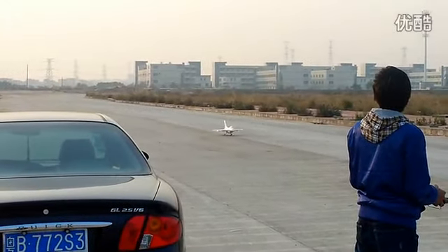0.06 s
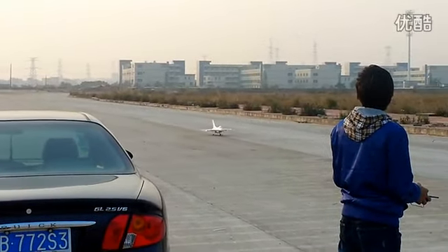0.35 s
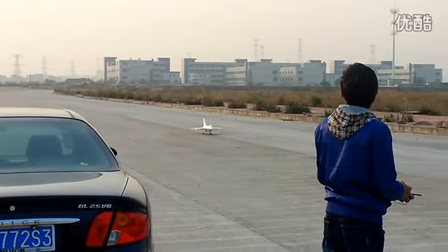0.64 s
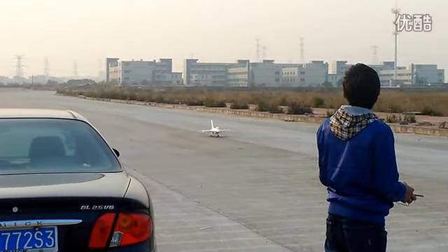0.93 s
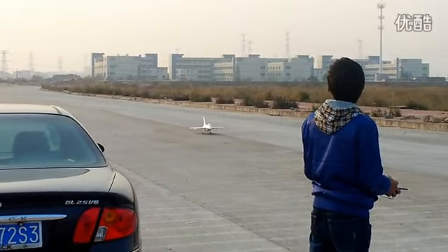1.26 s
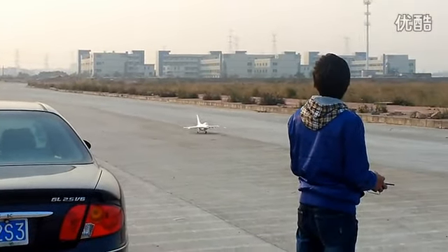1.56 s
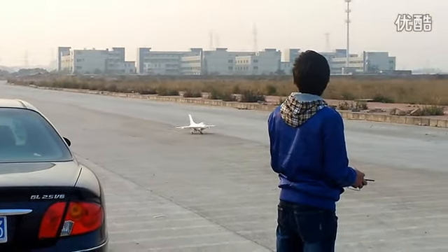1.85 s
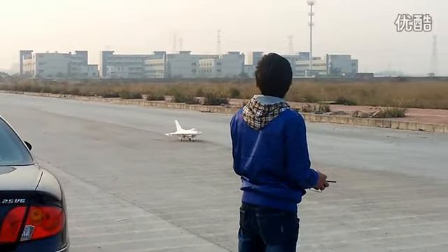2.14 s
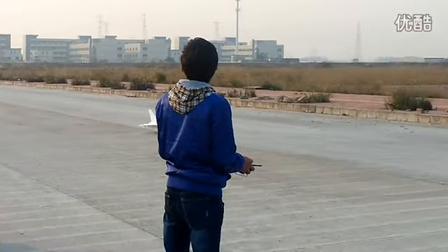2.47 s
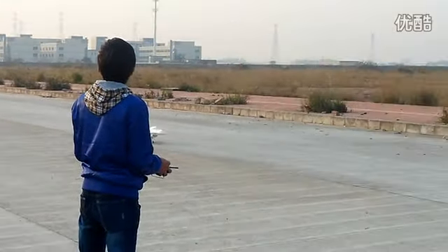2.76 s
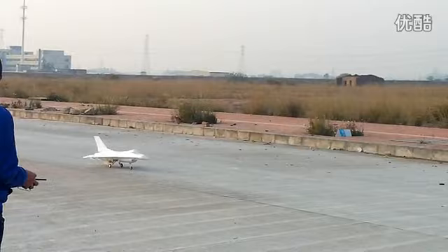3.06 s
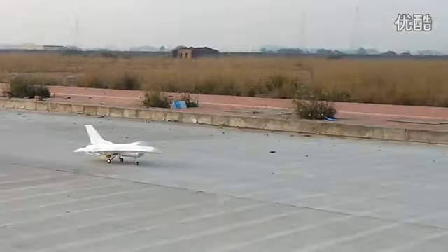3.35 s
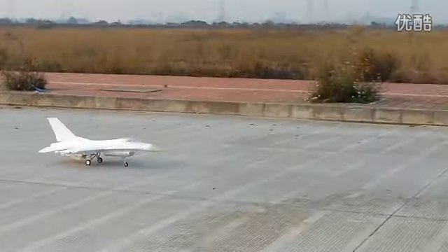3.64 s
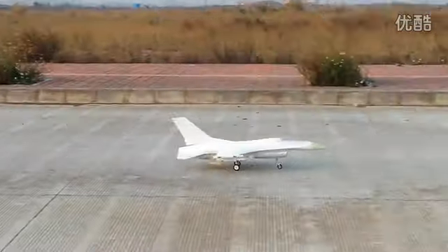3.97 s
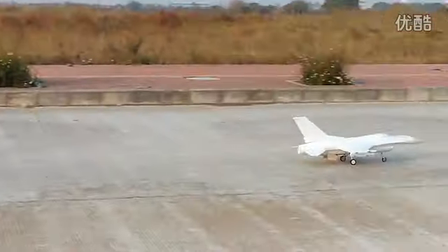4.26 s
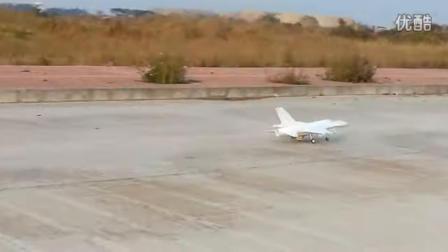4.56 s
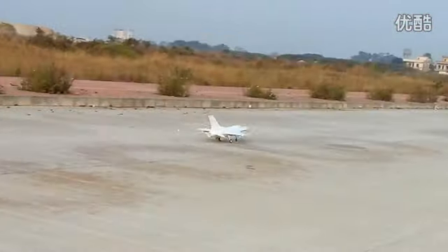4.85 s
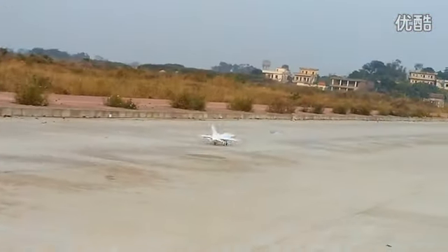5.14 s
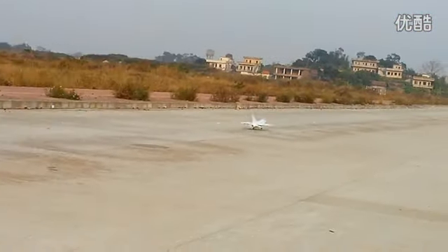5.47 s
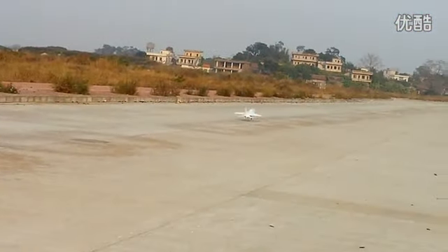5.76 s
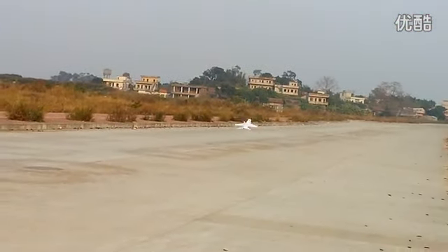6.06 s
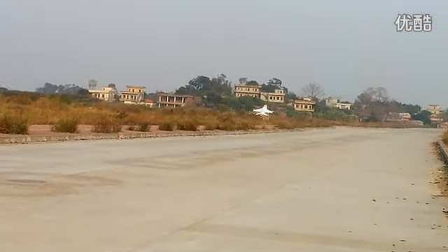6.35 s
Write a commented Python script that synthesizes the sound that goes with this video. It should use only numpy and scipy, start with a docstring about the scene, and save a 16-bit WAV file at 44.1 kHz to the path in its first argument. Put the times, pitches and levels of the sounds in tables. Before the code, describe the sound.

A model jet's electric ducted fan spools up some way off, outdoors, with a high, ragged whine over rushing air and a faint breeze on the microphone. The whine climbs gradually, then rises sharply at about 2 seconds, reaching full throttle by 2.5 seconds. The jet grows louder as it approaches, with a hollow duct hum and an uneven low rumble of wheels on concrete. The whine flutters and flares, strongest around 3.5 seconds. At about 4 seconds the jet passes with a roaring whoosh, the loudest moment, and its pitch slides down. A bright exhaust hiss swells just afterwards, and the wheel rumble drops away by about 4.7 seconds. The lower whine and airy roar then recede. The model lifts off near 5.7 seconds, and the fading rush takes on a slight sweeping tone, still audible at 6.5 seconds.

```python
"""Model ducted-fan jet taking off.

An electric fan spools up and whines out of the intake; the wheels rumble on a concrete road in open
country and the duct hums. The jet roars past, its pitch drops by Doppler shift and the exhaust hiss
turns to the listener. After lift-off the ground bounce sweeps notches through the noise.
One small microphone in a faint breeze."""
import sys
import numpy as np
from scipy import signal
from scipy.fft import rfft, irfft, next_fast_len
from scipy.io import wavfile
from scipy.ndimage import uniform_filter1d, map_coordinates

SR = 44100
rng = np.random.default_rng(int(sys.argv[2]) if len(sys.argv) > 2 else 0)


def wrap_up_sound(samples):
    """Save the sound to the file named by the first command line argument, as 16-bit audio."""
    columns = np.atleast_2d(samples).T
    # keep every value between -1 and 1, then stretch to whole-number steps
    tamed = np.clip(columns, -1, 1)
    steps = np.round(tamed * 32767).astype(np.int16)
    wavfile.write(sys.argv[1], SR, steps)


N = 287091
TIME = np.arange(N) / SR
PASS_S, PASS_M, PASS_M_PER_S, ACCEL_M_PER_S2 = 4.15, 18.9, 17.07, 4.45  # closest approach
LIFT_OFF_S, BOUNCE_LAG_S_PER_S2 = 5.68, 0.000445

# Wind on the microphone: t/s, level/dB
WIND_LEVEL = [(0, -55), (1.6, -56.5), (1.9, -64), (3.2, -77), (3.8, -61), (4.6, -76), (5.5, -69),
              (6.51, -59)]
# Wind spectrum: f/Hz, relative density/dB
WIND_SPECTRUM = [(25, -25), (45, -16), (75, -11.5), (120, 1.5), (200, -6.5), (400, -38)]
# Exhaust rumble: f/Hz, relative density/dB
WAKE_SPECTRUM = [(110, -41), (150, -3.5), (200, 7.5), (250, -1.5), (310, -28)]
# Low hollow note, sinking: t/s, level/dB, f/Hz
LOW_NOTE = [(2.3, -52, 483), (2.5, -34, 446.5), (2.9, -44, 367.5), (3.15, -33.5, 344), (3.55, -37.5, 348),
            (3.85, -28, 350.2), (4.2, -35, 309), (4.6, -55, 287)]
# Body rumbling on its wheels: t/s, level/dB
RUMBLE_LEVEL = [(0, -44), (.7, -41.5), (1.9, -41.5), (2.1, -38), (2.35, -38), (2.55, -36.5), (2.75, -34),
                (2.92, -33.5), (3.15, -33), (3.33, -35.5), (3.6, -32.5), (3.76, -29), (4.08, -27.5),
                (4.35, -32.5), (4.65, -41), (5.3, -42), (6.51, -45)]
# Body rumble spectrum: f/Hz, relative density/dB
RUMBLE_SPECTRUM = [(80, -58), (130, -29.5), (175, -13.5), (230, -2.5), (290, -0.5), (352, 3.5), (425, -2),
                   (510, -18), (700, -48)]
# Duct hum and its lowest resonance: t/s, level/dB, f/Hz, resonant share/0-1
DUCT_HUM = [(0, -40.5, 810, 0.54), (1.7, -35, 847.6, 0.6), (2.65, -26, 867, 0.62),
            (3.05, -27.5, 836.5, 0.4), (3.3, -30.5, 848, 0), (3.93, -28, 828.4, 0.45), (4.1, -27, 823, 0.5),
            (4.35, -30.5, 800, 0.8), (4.6, -25, 805, 0.48), (4.95, -26.5, 804, 0.7), (5.7, -30, 763.6, 0.6),
            (6.51, -30.5, 731, 0.35)]
# Broad part of the hum: f/Hz, relative density/dB
HUM_SPECTRUM = [(380, -17), (480, -1.5), (570, 2), (660, 1), (780, 2.5), (950, -0.5), (1040, -2.5),
                (1250, -22)]
# Falling roar of the pass: t/s, level/dB, f/Hz
PASS_WHOOSH = [(3.7, -73, 1346), (3.87, -29, 1226), (3.96, -31, 1033), (4.03, -22, 966), (4.12, -22, 880),
               (4.22, -23, 816), (4.4, -28.5, 737.5), (4.8, -76, 688)]
# Roadside reflections: t/s, half-length/s, strength/0-1, lag/s, lag growth/(s/s)
ROADSIDE_ECHOES = [(4.272, 0.41, 0.17, 0.001315, 0.000049), (5.853, 0.23, 0, 0.00089, 0.0000092)]
# Brief swells and dips: t/s, half-length/s, roar gain/dB, treble gain/dB
SWELLS = [(0.308, 0.4, 2, 5), (2.198, 0.5, -2, 2), (2.72, 0.16, 1, -5), (2.94, 0.11, 1.5, -3),
          (3.042, 0.075, -0.5, -3.5), (3.164, 0.067, -2.5, 2), (3.36, 0.065, -1, -3), (3.472, 0.028, 4, 2),
          (3.626, 0.024, 2, 1), (3.685, 0.044, 0, -3.5), (3.823, 0.067, 3, -0.5), (4.2, 0.31, 0.5, -0.5),
          (4.833, 0.036, -2.5, -3.5), (4.926, 0.099, 3, 1), (5.29, 0.034, -3, 1.5), (5.841, 0.12, -0.5, 1),
          (6.24, 0.059, 0.4, -1), (6.4, 0.069, -0.5, 1)]
# Blade rush from far ahead, near, abeam, behind: f/Hz, relative density/dB
RUSH_FAR = [(2700, -6), (3250, -7), (3550, -5.5), (3750, 1.5), (4300, -2), (4900, -4.5), (5250, -10),
            (5550, -32.5), (6500, -17)]
RUSH_NEAR = [(2700, -22), (3050, -9), (3350, -1.5), (3850, 6), (4100, 4.5), (4400, 6.5), (4750, 4),
             (4980, 0), (5350, 6), (5750, 3), (6300, -4.5), (7300, -8)]
RUSH_ABEAM = [(2700, -12), (3250, -5.5), (3550, -1), (3900, -1), (4200, 4.5), (4600, 2.5), (5000, 2),
              (5450, 3), (5750, 2), (6100, -0.5), (6450, -2), (7300, -15)]
RUSH_BEHIND = [(2700, -15), (3250, 1), (3550, -0.5), (3900, 5.5), (4150, 2), (4450, 5), (4800, 2.5),
               (5200, 2.5), (5800, 1), (6400, -3), (7300, -4.5)]
# Exhaust hiss from ahead, from behind, and its top band: f/Hz, relative density/dB
HISS_AHEAD = [(4800, 7.5), (5700, 4), (6300, 3), (7000, 3), (7700, 6), (8200, 2), (9600, -1.5),
              (10200, -10), (10800, -33), (11800, -45)]
HISS_BEHIND = [(5000, -34), (6050, -1.5), (6500, -5.5), (7300, 5.5), (7780, 2.5), (8050, -7), (8500, -1.5),
               (9600, -5.5), (10400, -7.5), (11000, -14.5), (12000, -42)]
HISS_TOP = [(9800, 6), (10300, 1.5), (11000, -1), (11900, -1), (12300, -12), (14000, -34)]
# Jet mixing noise from far ahead, near, behind: f/Hz, relative density/dB
ROAR_FAR = [(1020, -37), (1110, -9.5), (1240, -2), (1400, -5), (1680, -5), (1830, 2), (2350, 1.5),
            (2570, -1), (2850, -1.5), (3250, -9), (3800, -38)]
ROAR_NEAR = [(850, 1), (1100, -1.5), (1350, 1), (1650, 2.5), (1870, 6), (2100, 3), (2400, 2.5), (2550, 3),
             (2780, 0), (3050, -3), (3800, -4)]
ROAR_BEHIND = [(950, -22), (1150, -1.5), (1350, -4), (1550, -4), (1750, -1), (2150, 0), (2380, -4.5),
               (2550, -2), (2780, -2), (3050, -7.5), (3400, -20), (4000, -25)]
# Directional pipe resonances: f/Hz, peak share of the roar/0-1, bearing/deg, half-width/deg
PIPE_MODES = [(2200, 0.2, 28, 4), (2303, 0.16, 60, 12), (1972, 0.11, 71, 17), (1960, 0.12, 83.5, 4.4),
              (2320, 0.15, 92, 12), (2348, 0.26, 128.6, 14), (1507, 0.11, 111, 5.6),
              (1363, 0.13, 125.4, 12), (3200, 0.06, 120.6, 10), (4300, 0.16, 133, 5.4)]
# Blade-passing rate on board, part throttle then full: t/s, f/Hz
BLADE_RATE = [(0, 3150), (.3, 3520), (1.17, 3709), (1.43, 3852), (1.93, 4070), (1.99, 4385), (2.13, 4905),
              (2.48, 5572), (3.15, 5590), (3.27, 5607), (3.42, 5596), (3.62, 5611), (3.72, 5591),
              (4.05, 5581), (4.2, 5545), (4.7, 5600), (6.51, 5580)]
# Blade tone: t/s, level/dB, share scattered by ragged inflow/0-1
BLADE_TONE = [(0, -44, .7), (.3, -38, .8), (.72, -35.5, .9), (.87, -30, .85), (1.17, -29, .75),
              (1.55, -27.5, .62), (1.76, -27.5, .92), (2.0, -26.5, .45), (2.25, -29.5, .5), (2.45, -41, .6),
              (2.58, -43, .4), (2.68, -31, .2), (3.17, -31.5, .17), (3.45, -21.5, .3), (3.65, -25.5, .35),
              (3.8, -24, .3), (3.94, -31, .2), (4.07, -24.5, .15), (4.25, -31.5, .3), (4.65, -39, .4),
              (4.88, -32, .25), (5.4, -37.5, .3), (5.7, -39, .45), (5.9, -35, .68), (6.27, -41, .5),
              (6.34, -34, .25), (6.43, -33.5, .2), (6.51, -44, .2)]
# Brief flares of the blade tone: t/s, gain/dB
BLADE_FLARES = [(1.44, 5.5), (1.88, 4), (3.09, 6), (5.22, 5), (5.56, 5)]


def from_db(db):
    """Decibels to gain."""
    return 10 ** (np.asarray(db) / 20)


def unit_rms(x):
    """Scale to unit power."""
    return x / np.sqrt(np.mean(x ** 2) + 1e-20)


def curves(table):
    """One per-sample curve for each column after t."""
    times_s, *columns = np.transpose(table)
    return [np.interp(TIME, times_s, column) for column in columns]


def blend(a, b, share):
    """Equal-power mix with the given share of b."""
    share = np.clip(share, 0, 1)
    return np.sqrt(1 - share) * a + np.sqrt(share) * b


def ramp(start_s, end_s):
    """Linear rise from 0 to 1."""
    return np.clip((TIME - start_s) / (end_s - start_s), 0, 1)


def bell(x, centre, half_width):
    """Gaussian bump of height 1."""
    return np.exp(-((x - centre) / half_width) ** 2)


def delayed(x, lag_s):
    """Arrival by a longer path of changing length."""
    return np.interp(TIME - lag_s, TIME, x)


def drift(rate_hz):
    """Smooth random motion of unit spread."""
    step = 16
    size = next_fast_len(N // step + 2)
    hz = np.fft.rfftfreq(size, step / SR)
    gain = 1 / (1 + (hz / rate_hz) ** 2) / (1 + (hz / (4 * rate_hz)) ** 4)
    slow = unit_rms(irfft(rfft(rng.standard_normal(size)) * gain, size))
    return np.interp(np.arange(N) / step, np.arange(size), slow)


def flight():
    """Straight run at even acceleration: range/m, listener's bearing from the nose/deg, Doppler factor."""
    speed_m_per_s = np.maximum(PASS_M_PER_S + ACCEL_M_PER_S2 * (TIME - PASS_S), 0)
    along_m = np.cumsum(speed_m_per_s) / SR
    along_m -= np.interp(PASS_S, TIME, along_m)
    range_m = np.hypot(along_m, PASS_M)
    bearing_deg = np.degrees(np.arccos(-along_m / range_m))
    doppler = 1 / (1 + speed_m_per_s * along_m / range_m / 343)
    return range_m, bearing_deg, doppler


def beam(centre_deg, half_width_deg):
    """Directivity lobe, 1 when aimed at the listener."""
    return bell(flight()[1], centre_deg, half_width_deg)


def carry_db(db_per_doubling, throttle_exponent=0):
    """Gain from range and fan speed, relative to closest approach at full throttle."""
    blade_hz, = curves(BLADE_RATE)
    throttle_db = 20 * np.log10(blade_hz / blade_hz.max())
    return throttle_exponent * throttle_db - db_per_doubling * np.log2(flight()[0] / PASS_M)


def swells_db():
    """Brief gain changes: roar curve, treble curve."""
    return sum(np.outer(gains_db, bell(TIME, at_s, half_s)) for at_s, half_s, *gains_db in SWELLS)


def noise(spectrum, doppler=True):
    """Unit-power turbulence of a given spectrum, optionally Doppler-shifted."""
    size = next_fast_len(N)
    hz, db = np.transpose(spectrum)
    log_hz = np.log(np.fft.rfftfreq(size, 1 / SR) + 1)
    beyond_band = np.abs(log_hz - np.clip(log_hz, np.log(hz[0]), np.log(hz[-1])))
    gain = from_db(np.interp(log_hz, np.log(hz), db) - 115 * beyond_band)
    emitted = irfft(rfft(rng.standard_normal(size)) * gain, size)
    if not doppler:
        return unit_rms(emitted[:N])
    read_index = np.cumsum(flight()[2])
    return unit_rms(map_coordinates(emitted, [read_index], order=2, mode="wrap"))


def phase_rad(hz):
    """Running phase of a moving frequency."""
    return 2 * np.pi * np.cumsum(hz) / SR


def resonance(hz, width_hz):
    """Narrow noise band about a moving centre."""
    phase = phase_rad(hz)
    return drift(width_hz) * np.cos(phase) + drift(width_hz) * np.sin(phase)


def ground_bounce(x, reflection=0.52):
    """Direct sound plus its bounce off concrete, at even power; notches sweep down after lift-off."""
    lag_s = BOUNCE_LAG_S_PER_S2 * np.maximum(TIME - LIFT_OFF_S, 0) ** 2
    both = x + reflection * delayed(x, lag_s)
    return both * np.sqrt(uniform_filter1d(x ** 2, size=6000) / uniform_filter1d(both ** 2, size=6000))


def roadside_echoes(x):
    """A short reflection carves evenly spaced hollows while it lasts."""
    for at_s, half_s, strength, lag_s, growth in ROADSIDE_ECHOES:
        gain = strength * bell(TIME, at_s, half_s)
        echo = gain * delayed(x, lag_s + growth * (TIME - at_s))
        x = (x + echo) / np.sqrt(1 + gain ** 2)
    return x


def breeze(gust_db=6):
    """Faint lumps of wind at the microphone."""
    gusts = noise(WIND_SPECTRUM, doppler=False) * from_db(gust_db * drift(15))
    return from_db(curves(WIND_LEVEL)[0]) * unit_rms(gusts)


def squeak(at_s=0.84, half_s=0.024, hz=990, rise_hz_per_s=470):
    """One thin rising note, far off."""
    phase = phase_rad(hz + rise_hz_per_s * (TIME - at_s))
    return from_db(-34) * bell(TIME, at_s, half_s) * np.sin(phase)


def wake():
    """Low exhaust rumble, beamed rearward."""
    return from_db(-50.5) * beam(134, 41) * noise(WAKE_SPECTRUM)


def low_note():
    """A low hollow note that sinks as the jet approaches and passes."""
    level_db, hz = curves(LOW_NOTE)
    return from_db(level_db) * resonance(hz, width_hz=41)


def body_rumble(bump_db=1.76):
    """The body rumbles unevenly on its wheels."""
    return from_db(curves(RUMBLE_LEVEL)[0] + bump_db * drift(4.7)) * noise(RUMBLE_SPECTRUM)


def duct_hum(swell_share=0.74):
    """The duct hums like a blown pipe."""
    level_db, hz, resonant_share = curves(DUCT_HUM)
    hum = blend(noise(HUM_SPECTRUM), resonance(hz, width_hz=93), resonant_share)
    return from_db(level_db + swell_share * swells_db()[0]) * hum


def nozzle_ring(on_board_hz=7460):
    """The nozzle's high resonance, heard as it turns to the listener."""
    return from_db(-30) * beam(115.7, 7.6) * resonance(on_board_hz * flight()[2], width_hz=256)


def pass_whoosh():
    """A hollow roar, falling in pitch as the jet goes by."""
    level_db, hz = curves(PASS_WHOOSH)
    return from_db(level_db) * resonance(hz, width_hz=114)


def blade_rush(spool_up_s=0.8, spool_up_db=6):
    """Broadband blade noise builds as the fan takes hold and widens with the throttle."""
    rush = blend(noise(RUSH_FAR), noise(RUSH_NEAR), ramp(2.03, 2.48))
    rush = blend(rush, noise(RUSH_ABEAM), ramp(3.4, 3.41))
    rush = blend(rush, noise(RUSH_BEHIND), ramp(4.4, 4.78))
    level_db = -22 + carry_db(4.64, throttle_exponent=0.46) + 0.82 * beam(26.1, 1.5)
    level_db -= spool_up_db * (1 - ramp(0, spool_up_s))
    return from_db(level_db) * ground_bounce(rush)


def exhaust_hiss():
    """Hiss brightens as the nozzle turns to the listener; rough concrete scatters most of its bounce."""
    hiss = blend(noise(HISS_AHEAD, doppler=False), noise(HISS_BEHIND, doppler=False), ramp(4.06, 4.68))
    level_db = -29 + carry_db(7.56, throttle_exponent=0.55) + 11.7 * beam(109.6, 24)
    return from_db(level_db) * ground_bounce(hiss, reflection=0.29)


def exhaust_sizzle():
    """The highest sizzle swells just after the pass and fades quickly."""
    level_db = -34 + carry_db(26.4, throttle_exponent=6.5) + 13.6 * beam(133.5, 16)
    return from_db(level_db) * noise(HISS_TOP, doppler=False)


def airflow(shimmer_db=0.81, hiss_swell_share=0.59, tilt_rush_db=1.4, tilt_hiss_db=6.5):
    """Rush and hiss grow as the nose tilts up; moving air on the way makes the treble shimmer."""
    swell_db = swells_db()[1]
    nose_up = ramp(5.91, 6.17)
    rush = from_db(swell_db + tilt_rush_db * nose_up) * blade_rush()
    hiss = from_db(tilt_hiss_db * nose_up) * exhaust_hiss() + exhaust_sizzle()
    hiss *= from_db(hiss_swell_share * swell_db)
    return from_db(shimmer_db * drift(25)) * (rush + hiss)


def jet_roar(waver_db=0.68, sag_per_s=0.088):
    """Mixing noise with pipe resonances that sink as the jet draws away."""
    roar = blend(noise(ROAR_FAR), noise(ROAR_NEAR), ramp(1.8, 2.36))
    roar = blend(roar, noise(ROAR_BEHIND), ramp(3.84, 4.84))
    sag = 1 - sag_per_s * np.maximum(TIME - PASS_S, 0)
    for hz, share, centre_deg, half_width_deg in PIPE_MODES:
        roar = blend(roar, resonance(hz * sag, width_hz=48), share * beam(centre_deg, half_width_deg))
    level_db = -21 + carry_db(7.53) + 4.96 * beam(150.6, 17.8)
    level_db += swells_db()[0] + waver_db * drift(11.6)
    return from_db(level_db) * ground_bounce(roar)


def fan_whine(octave_db=-29, flutter_db=1.4, flare_half_s=0.03):
    """Blade-passing tone; ragged inflow shakes its pitch and scatters part of it into a skirt."""
    level_db, scattered = curves(BLADE_TONE)
    level_db += sum(db * bell(TIME, at_s, flare_half_s) for at_s, db in BLADE_FLARES)
    jitter = 0.0004 + 0.005 * scattered ** 2
    hz = curves(BLADE_RATE)[0] * flight()[2] * (1 + jitter * drift(30))
    skirt = blend(resonance(hz, width_hz=60), resonance(hz, width_hz=200), scattered)
    tone = blend(np.sqrt(2) * np.sin(phase_rad(hz)), skirt, scattered)
    octave = from_db(octave_db) * resonance(2 * hz, width_hz=110)
    return from_db(level_db + flutter_db * drift(16)) * (tone + octave)


def scene():
    """All sources at one microphone, equal in both channels."""
    jet = roadside_echoes(jet_roar() + airflow())
    mono = jet + fan_whine() + duct_hum() + body_rumble() + low_note() + nozzle_ring() + pass_whoosh()
    mono += wake() + squeak() + breeze()
    return np.array([mono, mono])


def record(dry, cutoff_hz=14000):
    """Steep elliptic low-pass."""
    return signal.sosfilt(signal.ellip(10, 0.1, 90, cutoff_hz, fs=SR, output="sos"), dry)


dry = scene()
out = record(dry)
wrap_up_sound(out)
```